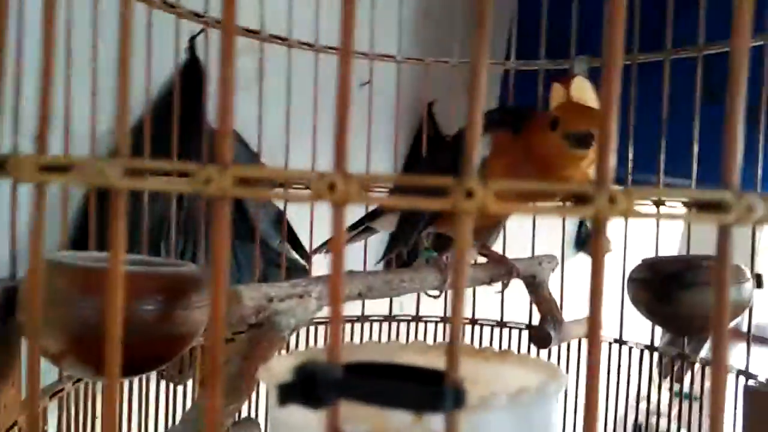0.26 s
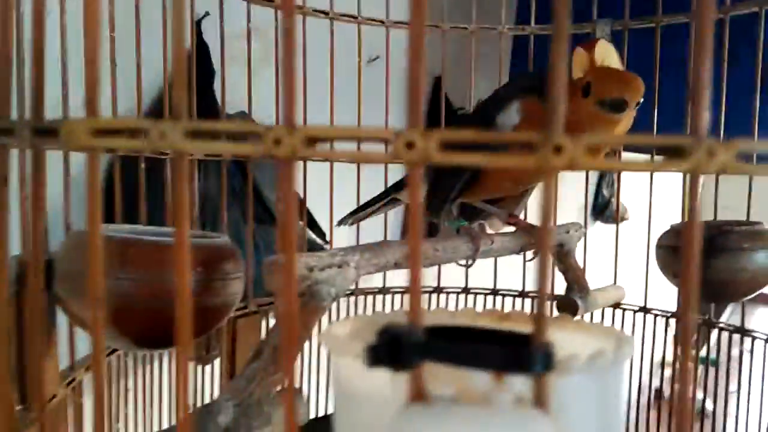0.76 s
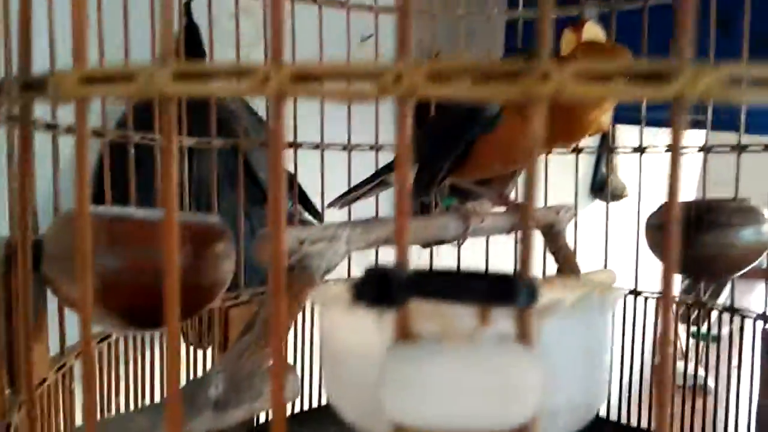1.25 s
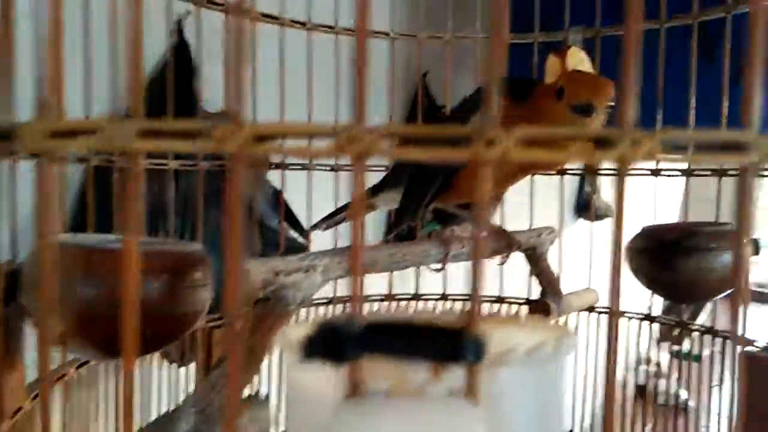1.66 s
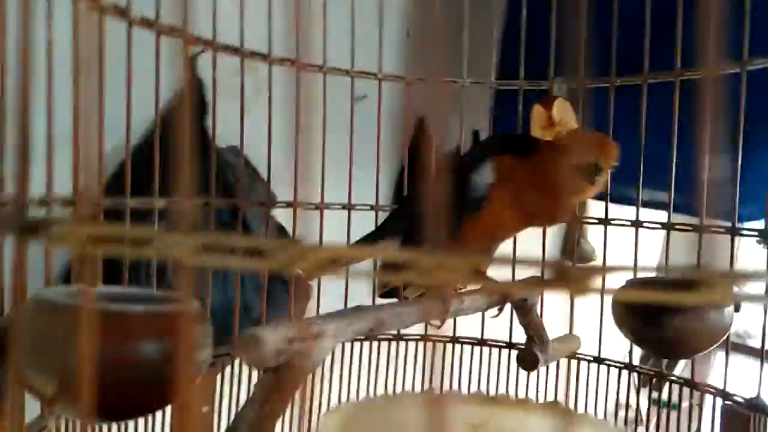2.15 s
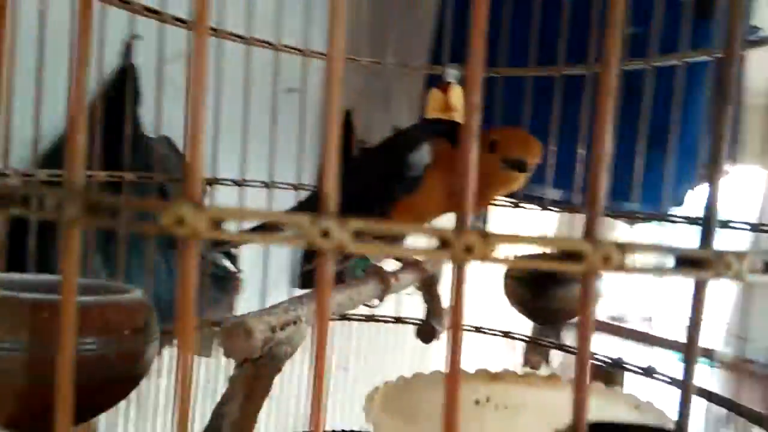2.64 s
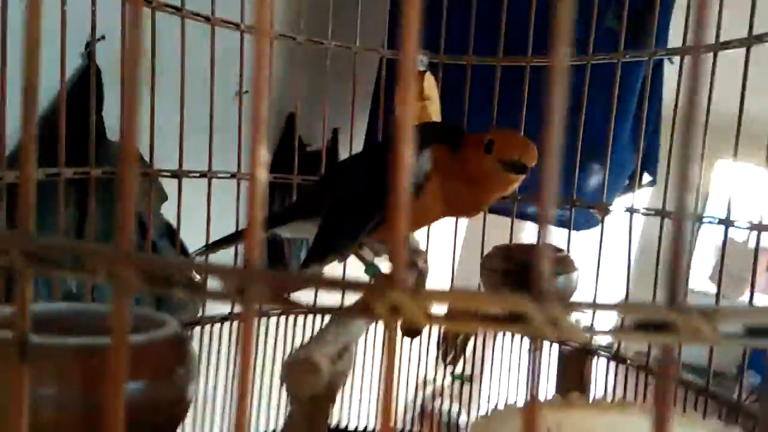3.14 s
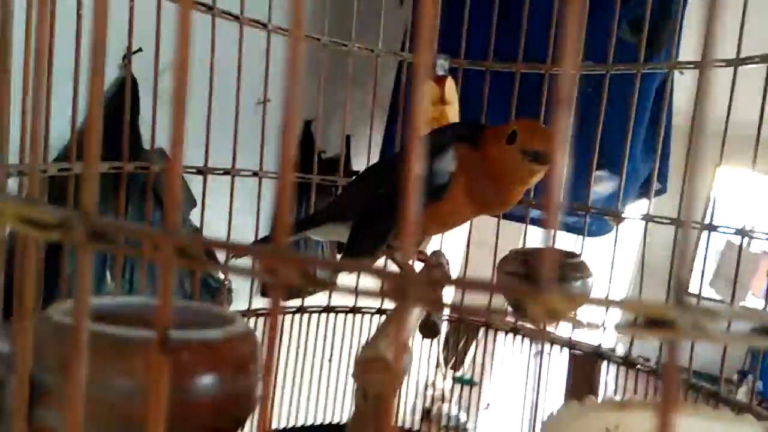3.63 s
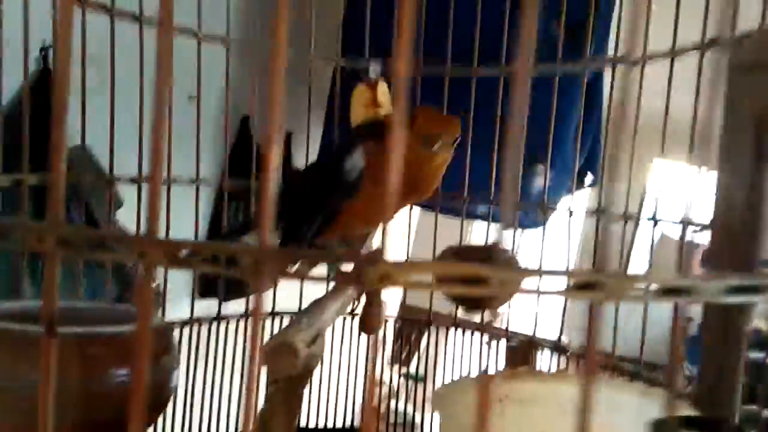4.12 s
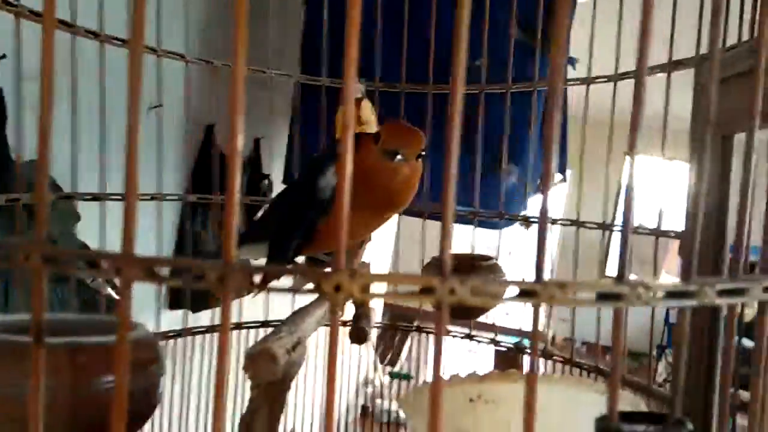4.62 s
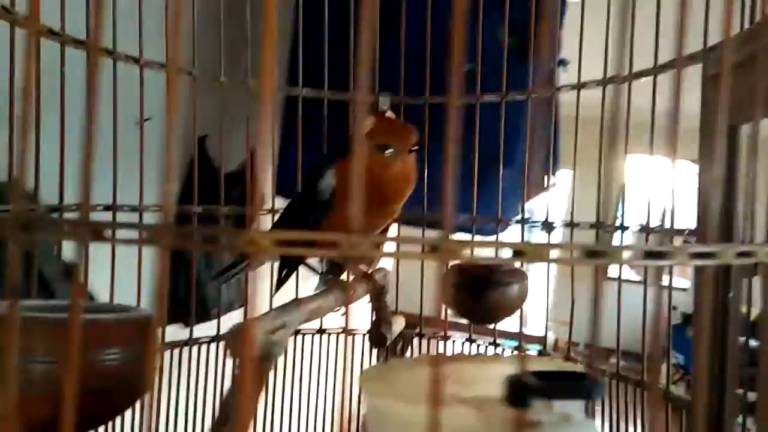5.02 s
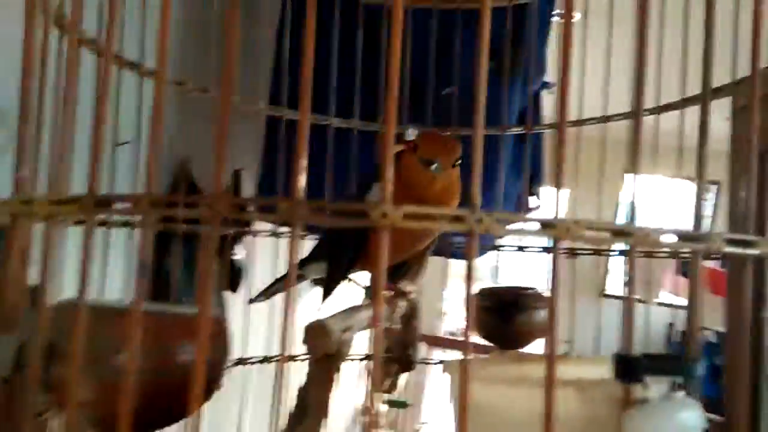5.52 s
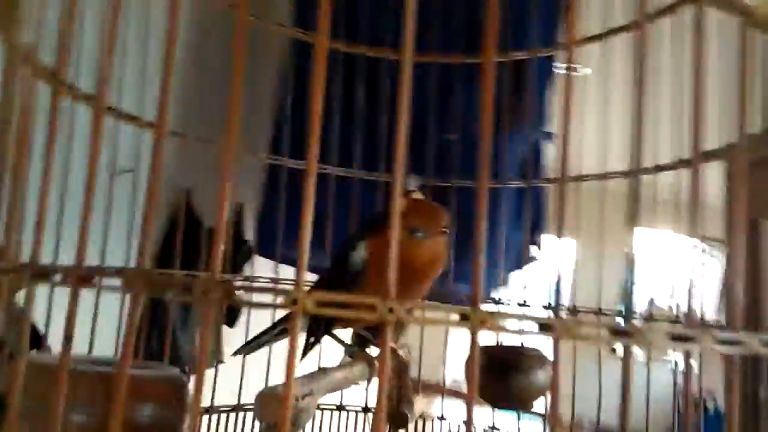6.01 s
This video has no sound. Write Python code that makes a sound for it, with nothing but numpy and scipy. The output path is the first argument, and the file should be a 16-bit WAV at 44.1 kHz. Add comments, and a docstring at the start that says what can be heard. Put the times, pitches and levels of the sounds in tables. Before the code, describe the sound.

A caged thrush sings close to the microphone in a hard-walled, lightly echoing room. A loud rising buzz comes first, then three quick soft swoops, a piercing falling whistle, a gentle rising one and three bright chips. A near pause holds only very faint distant calls. Two small warbles follow, then five rough low chucks, each with a soft hoarse after-note. A faint deep outdoor rumble lies underneath.

```python
"""A caged thrush sings close by in a hard-walled room, over a low outdoor rumble of shaped noise.
First a buzz from two coupled voices, three swoops, a falling and a rising whistle and three sharp chips,
led in by a faint one: pitch glides with overtones and rasp. In the pause come faint, room-soaked calls
from farther off. Then two double-humped warbles and five low chucks, each of two beating voices
and followed by a soft after-note. Reflections, a noise tail and a faint haze make the room."""
import sys
import numpy as np
from scipy import signal
from scipy.fft import rfft, irfft, next_fast_len
from scipy.io import wavfile
from scipy.ndimage import uniform_filter1d, map_coordinates

SR = 44100
rng = np.random.default_rng(int(sys.argv[2]) if len(sys.argv) > 2 else 0)


def digitize_waveform(pressure):
    """Quantize a signal to 16-bit integers and store it at the path in sys.argv[1].

    Rows of a 2-D input are taken as channels; values are limited to [-1, 1].
    """
    field = np.atleast_2d(pressure).T
    bounded = np.clip(field, -1, 1)
    quanta = np.round(bounded * 32767).astype(np.int16)
    wavfile.write(sys.argv[1], SR, quanta)


N = 276066

# tones of the coupled voices: multiple of the low voice, multiple of the high voice, level/dB
COUPLED_TONES = [(2, 0, -4), (1, 1, -5.5), (0, 2, -6.5), (-1, 2, -20.5), (3, -1, -22), (-2, 3, -36),
                 (-1, 3, -27.5), (4, -1, -46.5), (3, 0, -27.5), (2, 1, -41.5), (1, 2, -28.5), (0, 3, -29.5)]
# chips, the first one faint: t/s, length/s, top f/Hz, bottom f/Hz, step time/s, level/dB, roughness scale
CHIP_EVENTS = [(2.153, 0.01, 4560, 3960, 0.0095, -43, 0.7), (2.181, .039, 5900, 4468, .012, -22.5, .4),
               (2.268, .031, 5934, 4772, .019, -20, .65), (2.353, .037, 6354, 4790, .023, -23.5, 0.7)]
# shape of one swoop: share of the length, f/Hz, level/dB, roughness 0-1
SWOOP_SHAPE = [(0, 2445, -12.5, .35), (.16, 2336, -3, .25), (.35, 2090, -0.5, .1), (.5, 2190, -4.5, 0),
               (.68, 2705, 0, 0.2), (.89, 3378, -2.5, 0), (1, 3162, 1.5, 0.71)]
# where each syllable is sung: t/s, length/s, pitch ratio, level/dB
SWOOP_EVENTS = [(0.862, .1, 0.99, -44), (1.012, 0.1, 0.94, -41), (1.196, .117, 0.97, -41)]
WARBLE_EVENTS = [(4.514, .07, 0.99, -38), (4.778, .074, 0.99, -39)]
CHUCK_EVENTS = [(5.069, .028, 1.006, -35.5), (5.313, .036, .98, -35.5), (5.555, 0.038, 1.016, -33.5),
                (5.829, .04, 1.046, -30), (6.106, 0.042, 1.023, -35)]
AFTER_NOTE_EVENTS = [(5.127, 0.037, 1, -39.5), (5.381, 0.0378, .99, -40), (5.62, 0.041, 1, -39.5),
                     (5.899, .038, 1.01, -39), (6.179, 0.041, 1, -38.5)]
# calls from farther off: t/s, length/s, f/Hz, level/dB, roughness (capped at 1)
FAR_CALL_EVENTS = [(2.433, 0.088, 1977, -58.5, .15), (2.48, 0.18, 1050, -60, 1.05),
                   (2.83, 0.26, 2610, -59, 0.2), (4.1, .12, 2450, -72, 0.18)]
# what the beak lets out of the overtones and rasp: f/Hz, level/dB
SWOOP_BEAK = [(900, -50), (1500, -0.5), (4200, -23), (6500, -34), (9500, -24.5), (11000, -32.5),
              (13500, -21.5), (14500, -21)]
FALL_BEAK = [(2500, -54), (9300, -22.5), (10500, -24), (12000, -15), (14000, -34.5)]
RISE_BEAK = [(2000, -39.5), (5400, -25.5), (6400, -12.5), (8300, -26.5), (9500, -17.5), (11300, -33),
             (13000, -20)]
CHIP_BEAK = [(1500, -50), (3500, -19), (7000, -3.5), (9300, -9), (11000, -20.5), (12500, -16.5),
             (14000, -22)]
WARBLE_BEAK = [(900, -30), (2000, -17), (5100, -20.5), (7800, -15), (10400, -17), (11500, -29),
               (13000, -37)]
CHUCK_BEAK = [(900, -39), (2500, -5.5), (3600, -23.5), (4600, -17), (6500, -18.5), (8000, -18.5),
              (9700, -18.5), (11300, -41.5), (14000, -40)]
AFTER_NOTE_BEAK = [(900, -19.5), (3300, -10), (4500, -19), (7000, -19), (9400, -20.5), (11300, -38),
                   (14000, -31)]
FAR_BEAK = [(2000, -40), (5400, -23), (8000, -21), (10000, -13), (13000, -23)]
# spectral shape of the buzz's hiss: f/Hz, level/dB
BUZZ_HISS = [(2500, -20), (3200, -24), (4000, 0.5), (6000, -18), (8000, -9.5), (10300, -17), (14000, -18.5)]
# spectral shape of the hiss that goes with the song: f/Hz, level/dB
HAZE = [(1200, -14.5), (3000, -3), (5000, -2), (9000, 1.5), (11500, -6.5), (14000, -5)]
# decay of the room's tail: f/Hz, t60/s
ROOM_DECAY = [(500, 0.55), (2500, 0.74), (5500, 0.66), (8500, 0.9), (13000, 0.18)]
# colour of the room's answer: f/Hz, level/dB
ROOM_COLOUR = [(1000, -4), (2300, -0.5), (4500, 0.5), (6000, 4), (9000, 0.5), (13000, 3)]
# spectral shape of the outdoor rumble within its bands: f/Hz, level/dB
RUMBLE_SPECTRUM = [(18, -30.5), (30, -7.5), (60, 5), (164, -6), (235, -18), (311, -10.5), (363, -27.5),
                   (435, -12.5), (521, -24.5), (592, -17), (674, -17.5), (1220, -18), (1930, -24.5),
                   (3070, -40), (14000, -42.5)]
# swells of the rumble: t/s, level/dB
RUMBLE_SWELLS = [(0.0, -49), (0.05, -59), (0.78, -62), (0.82, -52.5), (1.11, -66), (4.32, -61.5),
                 (4.43, -65), (5.39, -55.5), (6.03, -56.5), (6.1, -63.5), (6.19, -47), (6.26, -57)]
# stereo width, side against mid: f/Hz, level/dB
WIDTH = [(3000, -66.5), (5500, -42), (8000, -19), (10000, -19), (13000, -22.5)]

BUZZ_START_S, BUZZ_LENGTH_S = 0.3816, 0.4083
FLUTTER_HZ, FLUTTER_SLOWS_HZ_PER_S = 23.36, 17  # rate of the buzz's pitch flutter, and how it slows
FLUTTER_DEPTH, FLUTTER_FADE_S = .02, 0.44  # its share of the pitch at first, and its decay time
FALL_START_S, FALL_LENGTH_S = 1.4102, .18
RISE_START_S, RISE_LENGTH_S = 1.74, .415
CHIP_DROP, CHIP_DROP_S = .27, 0.0067  # share of the pitch lost as the pressure is let go, over this time
REFLECTIONS, REFLECTIONS_DB = 8, -10  # quick reflections around the cage, and their summed level
DEEP_DB, LOW_DB, MIDDLE_DB = -2, -64.5, -66.5  # deep band against the swells; mean levels of the others
LOW_FOLLOWS = .4  # share of the swells, in dB, that the low band joins
TOP_HZ = 14350  # band limit


def opening_song():
    """The first phrase, each kind of note with its own share of the room."""
    chips = sum(chip(*row) for row in CHIP_EVENTS)
    return (in_room(buzz(), wet_db=-18.0, haze_db=-24)
            + in_room(swoops(), wet_db=-9.0, beaming_db=-2, haze_db=-20.5)
            + in_room(falling_whistle(), wet_db=-15.0, beaming_db=2.0, haze_db=-24)
            + in_room(rising_whistle(), wet_db=-5, beaming_db=7.5, haze_db=-23.5)
            + in_room(chips, wet_db=-15, beaming_db=0, haze_db=-25.5))


def closing_song():
    """Lower notes, which spread all round and fill the room: warbles, then chucks with after-notes."""
    return (in_room(warbles(), wet_db=-3, beaming_db=14, haze_db=-20)
            + in_room(chucks(), wet_db=-7.0, beaming_db=8.5, haze_db=-20)
            + in_room(after_notes(), wet_db=-6, beaming_db=8, haze_db=-14))


def buzz(low_jitter=0.0099, high_jitter=0.003):
    """Both sides of the syrinx slide up; their coupling makes sum and difference tones, which fade."""
    t = times(BUZZ_LENGTH_S)
    high_hz = glide(t, from_hz=4030, to_hz=4668, ease=.098)
    low_hz = glide(t, from_hz=3470, to_hz=3941, ease=.078, hold=1.4)
    high_db = -30.5 + envelope(t, attack=.05, release=0.025, start_db=-22.5, end_db=0)
    low_db = -34.5 - 14 * t + envelope(t, attack=0.059, release=0.018, start_db=-21.5, end_db=-9)
    coupled_db = -27 - 25 * t + envelope(t, attack=0.017, release=0.04, start_db=-16, end_db=-7)
    # the hiss ends in a puff
    air_db = -47 - 27 * t + envelope(t, attack=.01, release=.03, start_db=-3.5, end_db=17.5)

    flutter = np.cos(turns(FLUTTER_HZ - FLUTTER_SLOWS_HZ_PER_S * t))
    sway = 1 + FLUTTER_DEPTH * np.exp(-t / FLUTTER_FADE_S) * flutter
    high = turns(high_hz * (sway + high_jitter * wobble(500, t)))
    low = turns(low_hz * (sway + low_jitter * wobble(500, t)))

    voices = amp(high_db) * np.sin(high) + amp(low_db) * np.sin(low)
    coupled = sum(amp(db) * np.sin(round(m) * low + round(n) * high) for m, n, db in COUPLED_TONES)
    # the hiss pulses with the beat of the two voices
    pulsing = rng.standard_normal(len(t)) * (1 + np.cos(high - low))
    air = amp(air_db) * unit(coloured(pulsing, BUZZ_HISS))
    both = np.sqrt(2) * (voices + amp(coupled_db) * coupled)
    return placed(both + air, BUZZ_START_S + t, ramp=0.0084)


def swoops():
    """Whistles that dip, then climb, with overtones that brighten strongly as the pitch goes up."""
    return repeated(SWOOP_SHAPE, SWOOP_EVENTS, SWOOP_BEAK, quaver=.009, rasp_db=11, halving_db=-1,
                    pressing=3)


def falling_whistle(faint_db=-17, faint_s=0.031, vibrato=.018, vibrato_hz=30):
    """Starts high and faint, then leaps to full strength and clears as it sinks to a wavering pitch."""
    t = times(FALL_LENGTH_S)
    # the vibrato deepens along the note
    waver = 1 + vibrato * t / FALL_LENGTH_S * np.cos(2 * np.pi * vibrato_hz * t)
    hz = glide(t, from_hz=6210, to_hz=4677, ease=.055, hold=1.9) * waver
    leap_db = faint_db * np.exp(-(t / faint_s) ** 8)
    db = -30.5 + leap_db + envelope(t, attack=.08, release=0.018, start_db=-4, end_db=-5)
    rough = .05 + .25 * np.exp(-t / .03)
    return note(contour(FALL_START_S + t, hz, db, rough), FALL_BEAK, quaver=.005)


def rising_whistle(vibrato=0.0099, vibrato_hz=24):
    """A soft whistle that creeps upward with a slight vibrato."""
    t = times(RISE_LENGTH_S)
    waver = 1 + vibrato * np.sin(2 * np.pi * vibrato_hz * t)
    hz = glide(t, from_hz=2630, to_hz=3299, ease=.165, hold=0.69) * waver
    db = -44.5 + envelope(t, attack=.1, release=.025, start_db=-10, end_db=-9.5)
    return note(contour(RISE_START_S + t, hz, db, .06), RISE_BEAK, quaver=.005, jitter=.05, rasp_db=6)


def chip(start, length, top_hz, bottom_hz, step_s, db, rough_scale, trill=.03, trill_hz=210, trill_db=2):
    """A quick step down in pitch with a very fast trill; it roughens and collapses at its end."""
    t = times(length)
    collapse = 1 - CHIP_DROP * np.clip(1 - (length - t) / CHIP_DROP_S, 0, 1)
    shake = np.cos(2 * np.pi * trill_hz * t)
    hz = glide(t, top_hz, bottom_hz, step_s, hold=3.5) * collapse * (1 + trill * shake)
    level = db + trill_db * shake + envelope(t, attack=0.0083, release=.009, start_db=-18, end_db=-16)
    rough = rough_scale * (0.15 + 0.69 * t / length)
    return note(contour(start + t, hz, level, rough), CHIP_BEAK, quaver=.012, jitter=0.11,
                jitter_rate=1500, shimmer_db=1.5, rasp_db=-0.5)


def warbles():
    """Fairly clear double-humped syllables, a little rough at the ends."""
    clear = double_hump(hz=2590, swing=.028, sag=.035, swing_db=2.5, rough=.08, end_rough=.13)
    return repeated(clear, WARBLE_EVENTS, WARBLE_BEAK, quaver=.003, jitter=.05, rasp_db=12)


def chucks():
    """Harsh two-voiced notes: a growl from one side of the syrinx and a plunging slide from the other."""
    growls = repeated(chuck_growl(), CHUCK_EVENTS, CHUCK_BEAK, quaver=.015, jitter=.08, jitter_rate=500,
                      shimmer_db=7, rasp_db=13)
    slides = repeated(chuck_slide(), CHUCK_EVENTS, CHUCK_BEAK, quaver=0.018, jitter=0.061,
                      jitter_rate=464, shimmer_db=11, rasp_db=4.5, pressing=5.4)
    return growls + slides


def chuck_growl():
    """One side of the syrinx opens the chuck with a low growl that grows rougher."""
    u = np.linspace(0, 1, 100)
    db = -8.0 + envelope(u, attack=0.049, release=0.38, start_db=2, end_db=-14.5)
    return contour(u, glide(u, from_hz=1960, to_hz=1778, ease=0.1478), db, 0.27 + .5 * u)


def chuck_slide(enters=0.27):
    """The other side joins late and plunges to just above the growl, beating against it."""
    u = np.linspace(0, 1, 100)
    hz = glide(u, from_hz=3670, to_hz=1919.6, ease=.125, hold=1.326)
    db = envelope(u, attack=.27, release=.28, start_db=-14, end_db=-16)
    return contour(enters + (1 - enters) * u, hz, db, .52)


def after_notes():
    """Soft, hoarse double-humped syllables with some of the octave below."""
    hoarse = double_hump(hz=2310, swing=.04, sag=.06, swing_db=1.5, rough=.3, end_rough=.5)
    return repeated(hoarse, AFTER_NOTE_EVENTS, AFTER_NOTE_BEAK, quaver=.015, jitter=.04, jitter_rate=400,
                    shimmer_db=7, rasp_db=8, halving_db=-6)


def double_hump(hz, swing, sag, swing_db, rough, end_rough, humps=2.286, centre=0.503):
    """A syllable with two humps in pitch and level, which sags and frays at both ends."""
    u = np.linspace(0, 1, 100)
    hump = -np.cos(2 * np.pi * humps * (u - centre))
    ends = (2 * u - 1) ** 4
    db = swing_db * (hump - 1) + envelope(u, attack=0.55, release=.1, start_db=-7, end_db=1.5)
    return contour(u, hz * (1 + swing * hump - sag * ends), db, rough + end_rough * ends)


def repeated(shape, events, beak, **voice):
    """One syllable sung again and again at slightly different lengths, pitches and levels."""
    song = 0
    for start, length, ratio, db in events:
        rows = np.array(shape) * [length, ratio, 1, 1] + [start, 0, db, 0]
        song = song + note(rows, beak, **voice)
    return song


def note(rows, beak, quaver=.004, jitter=0.021, jitter_rate=1400, shimmer_db=4, rasp_db=2, halving_db=-30,
         pressing=0, flicker_db=3):
    """One side of the syrinx: a whistle with overtones, whose cycles turn uneven as it roughens."""
    t = span(rows)
    hz, db, rough = curves(rows, t)
    unsteady = 1 + quaver * wobble(90, t) + jitter * rough * wobble(jitter_rate, t)
    hz = uniform_filter1d(hz, size=90, mode="nearest") * unsteady
    phase = turns(hz)
    # a rough voice alternates strong and weak cycles, which adds the octave below
    tone = np.sin(phase) + amp(halving_db) * rough ** 2 * np.sin(phase / 2)
    # higher pitch takes more pressure, and that brightens the tone
    brightness = (hz / hz.mean()) ** pressing
    # each overtone flickers in its own way
    overtones = brightness * sum((k * hz < SR / 2) * amp(flicker_db * wobble(110, t)) * np.sin(k * phase)
                                 for k in range(2, 8))
    # air torn at the membrane adds a rasp, once a cycle
    rasp = amp(rasp_db) * rough * unit(rng.standard_normal(len(t)) * (1 + np.sin(phase)))
    voice = np.sqrt(2) * (tone + coloured(overtones + rasp, beak))
    shimmer = shimmer_db * rough * np.tanh(wobble(jitter_rate / 2, t))
    return placed(amp(db + shimmer) * voice, t)


def contour(t, hz, db, rough):
    """Time, pitch, level and roughness of a note, as rows."""
    return np.column_stack(np.broadcast_arrays(t, hz, db, np.clip(rough, 0, 1)))


def glide(t, from_hz, to_hz, ease, hold=1):
    """A pitch that settles on its goal; a hold over 1 makes it linger before it sets off."""
    return to_hz + (from_hz - to_hz) * np.exp(-(t / ease) ** hold)


def envelope(t, attack, release, start_db, end_db):
    """Level in dB: from start_db to 0, held, then to end_db."""
    start = start_db * np.clip(1 - t / attack, 0, 1)
    end = end_db * np.clip(1 - (t[-1] - t) / release, 0, 1)
    return start + end


def far_calls():
    """Faint calls from farther off, with a generous share of the room."""
    return in_room(sum(far_call(*row) for row in FAR_CALL_EVENTS), wet_db=-5.5, beaming_db=-5.0)


def far_call(start, length, hz, db, rough):
    """A wavering note that swells and fades."""
    t = times(length)
    level = db + envelope(t / length, attack=0.48, release=0.53, start_db=-18, end_db=-14)
    return note(contour(start + t, hz, level, rough), FAR_BEAK, quaver=.008, jitter=.12, jitter_rate=500,
                rasp_db=9)


def in_room(x, wet_db, beaming_db=0, haze_db=-40):
    """Direct sound, quick reflections around the cage and the room's decaying noise tail."""
    hz, t, z = signal.stft(rng.standard_normal(SR), SR, nperseg=256)
    decay = amp(-60 * t / along(ROOM_DECAY, hz)[:, None])
    tail = unit(signal.istft(z * decay, SR, nperseg=256)[1]) / np.sqrt(SR)
    tail = np.pad(tail, (round(0.0049 * SR), 0)) * amp(wet_db)
    arrivals = (rng.uniform(.0008, .007, size=REFLECTIONS) * SR).astype(int)
    tail[arrivals] += amp(REFLECTIONS_DB) * rng.choice([-1, 1], size=REFLECTIONS) / np.sqrt(REFLECTIONS)
    answer = coloured(tail, ROOM_COLOUR)
    # overtones beamed at the microphone feed the room less; a negative beaming feeds it more
    fed = coloured(x, [(2800, 0), (7000, -beaming_db)])
    # a faint hiss that follows each note is heard only by way of the room
    haze = amp(haze_db) * coloured(x * rng.standard_normal(N), HAZE)
    return x + signal.oaconvolve(fed + haze, answer)[:N]


def outdoors():
    """A distant rumble of noise in three bands, which swells most in its deepest one."""
    t = np.arange(N) / SR
    level_db, = curves(RUMBLE_SWELLS, t)
    swell_db = level_db - level_db.mean()
    deep_db = level_db + DEEP_DB + 2.5 * wobble(9.7, t)
    low_db = LOW_DB + LOW_FOLLOWS * swell_db + 1.2 * wobble(7.1, t)
    middle_db = MIDDLE_DB + 1.2 * wobble(8.3, t)
    return (rumble_band(35, 77) * amp(deep_db) + rumble_band(140, 400) * amp(low_db)
            + rumble_band(470, SR) * amp(middle_db))


def rumble_band(from_hz, to_hz):
    """Noise in the rumble's spectral shape, kept between two soft edges, at rms 1."""
    def below(hz, edge):
        return 1 / (1 + (hz / edge) ** 8)

    def response(hz):
        window = np.sqrt(np.abs(below(hz, to_hz) - below(hz, from_hz)))
        return amp(along(RUMBLE_SPECTRUM, hz)) * window

    return unit(filtered(rng.standard_normal(N), response))


def suppressed(x, threshold_db, depth_db=-9, from_hz=2800):
    """A noise suppressor: treble sinking near the threshold is turned down, which cuts the tail short."""
    hz, t, z = signal.stft(x, SR, nperseg=512)
    power = np.mean(np.abs(z) ** 2, axis=0)
    # smoothed over neighbouring frequencies, then over time
    power = np.abs(uniform_filter1d(uniform_filter1d(power, size=7, axis=0), size=5, axis=1))
    quiet = 1 / (1 + (power / amp(threshold_db) ** 2) ** 2)
    gain = amp(depth_db * quiet * (hz > from_hz)[:, None])
    return signal.istft(z * gain, SR, nperseg=512)[1][:, :N]


def amp(db):
    """Decibels to gain."""
    return 10 ** (np.asarray(db) / 20)


def unit(x):
    """Scaled to rms 1."""
    return x / np.sqrt(np.mean(x ** 2) + 1e-20)


def along(points, hz):
    """(Hz, value) points read on a log frequency axis."""
    f, v = np.transpose(points)
    return np.interp(np.log(np.abs(hz) + 1), np.log(f + 1), v)


def curves(rows, t):
    """Each column after the time, at the times t."""
    s, *cols = np.transpose(rows)
    return [np.interp(t, s, c) for c in cols]


def wobble(rate, t):
    """A smooth random curve, rate knots a second."""
    knots = (t - t[0]) * rate
    return map_coordinates(rng.standard_normal(int(knots[-1]) + 4), [knots + 1])


def filtered(x, response):
    """x times a response of frequency."""
    count = x.shape[-1]
    size = next_fast_len(count + 4096)
    return irfft(rfft(x, size) * response(np.fft.rfftfreq(size, 1 / SR)), size)[..., :count]


def coloured(x, points):
    """x through a spectrum of (Hz, dB) points."""
    return filtered(x, lambda hz: amp(along(points, hz)))


def times(length_s):
    """Sample times from the start of a note."""
    return np.arange(round(length_s * SR)) / SR


def span(rows):
    """Sample times from the first row to the last."""
    return np.arange(round(rows[0][0] * SR), round(rows[-1][0] * SR)) / SR


def placed(x, t, ramp=0.0024):
    """A note set at its time, with a quick start and stop."""
    gate = np.clip(np.minimum(t - t[0], t[-1] - t) / ramp, 0, 1)
    return np.pad(x * gate, (round(t[0] * SR), N))[:N]


def turns(hz):
    """Running phase of a pitch curve."""
    return 2 * np.pi * np.cumsum(hz) / SR


def scene():
    """Song, far calls and rumble; chiefly the treble reaches the two microphone ports out of step."""
    mid = opening_song() + closing_song() + far_calls() + outdoors()
    # a quarter turn of phase sets the two sides apart
    side = filtered(mid, lambda hz: 1j * amp(along(WIDTH, hz)))
    return np.array([mid + side, mid - side])


def record(dry, hiss_db=-78):
    """The microphone hisses, the recorder suppresses faint treble and cuts steeply above its band limit."""
    heard = suppressed(dry + amp(hiss_db) * rng.standard_normal(N), threshold_db=-85.5)
    return filtered(heard, lambda hz: 1 / np.sqrt(1 + (hz / TOP_HZ) ** 400))


dry = scene()
out = record(dry)
digitize_waveform(out)
```